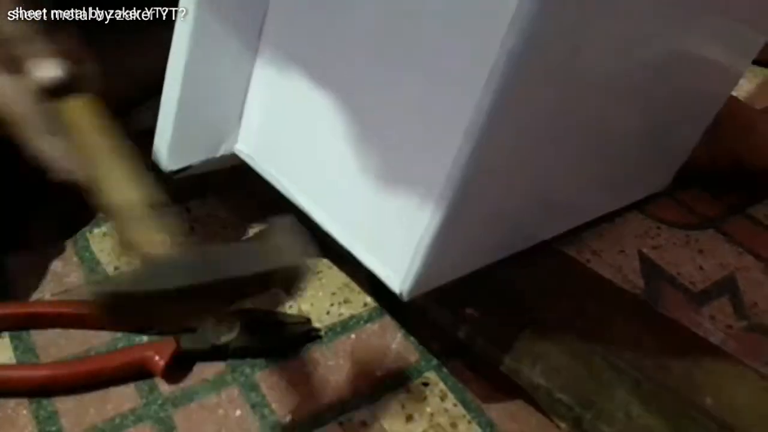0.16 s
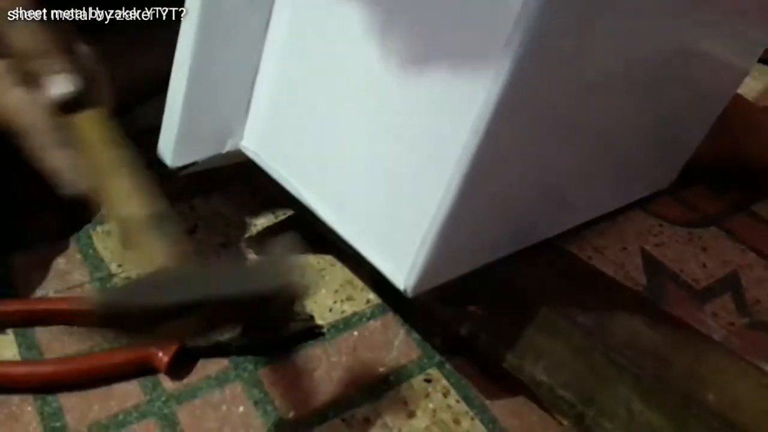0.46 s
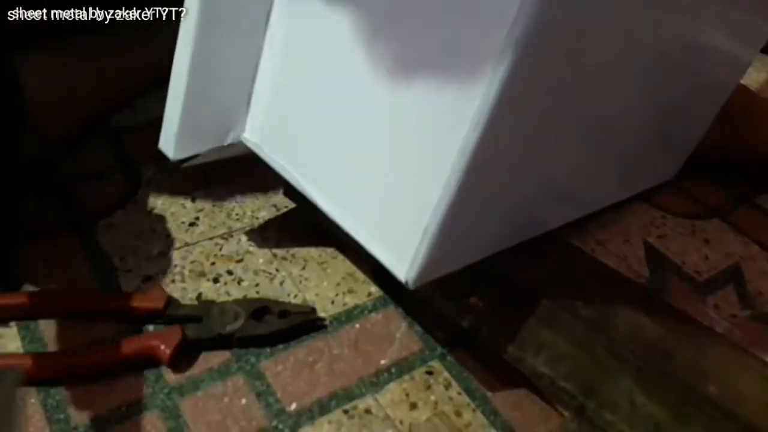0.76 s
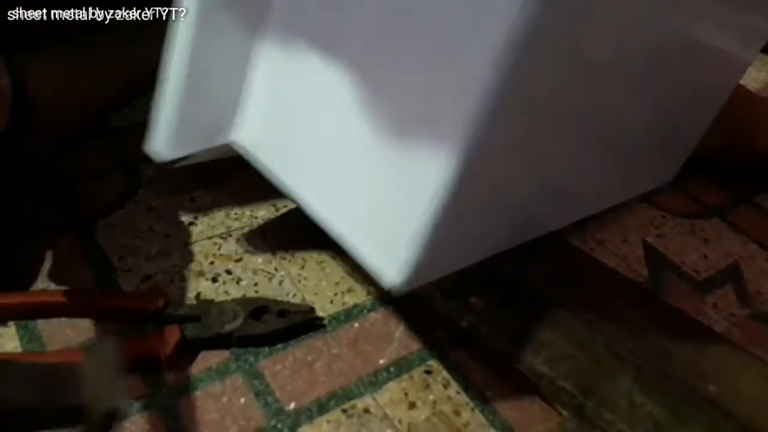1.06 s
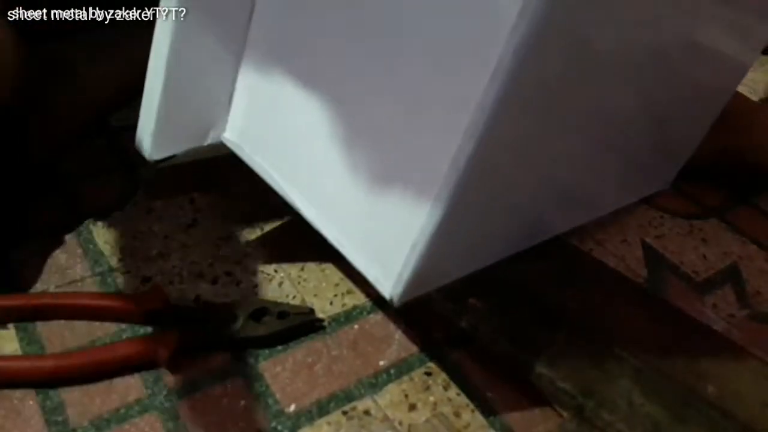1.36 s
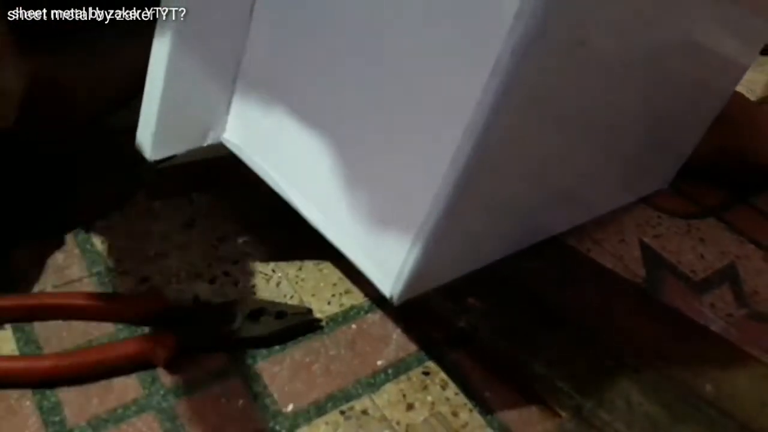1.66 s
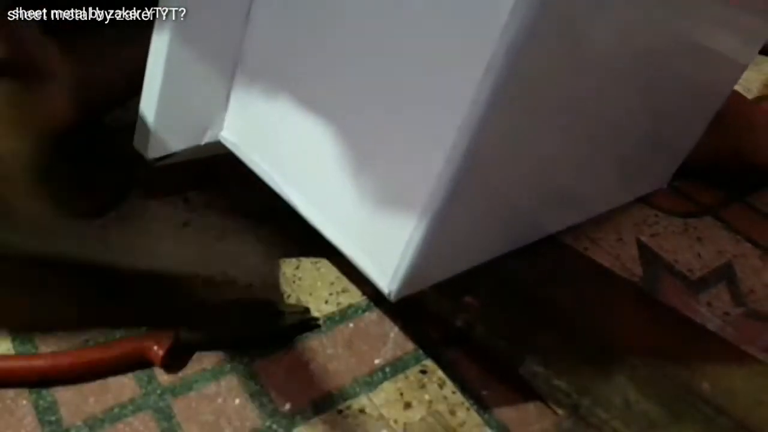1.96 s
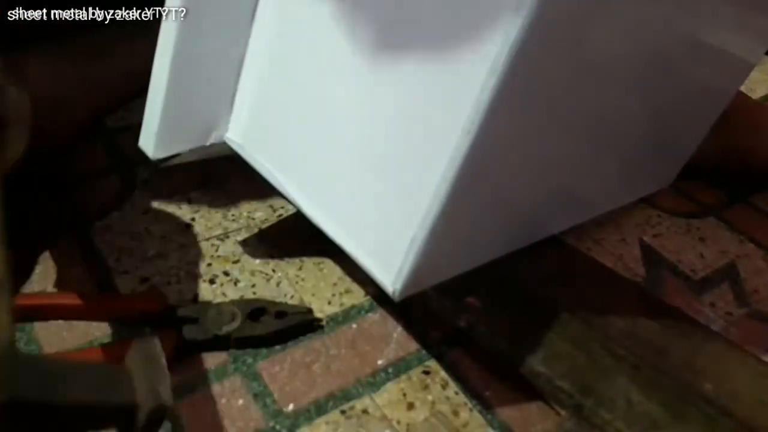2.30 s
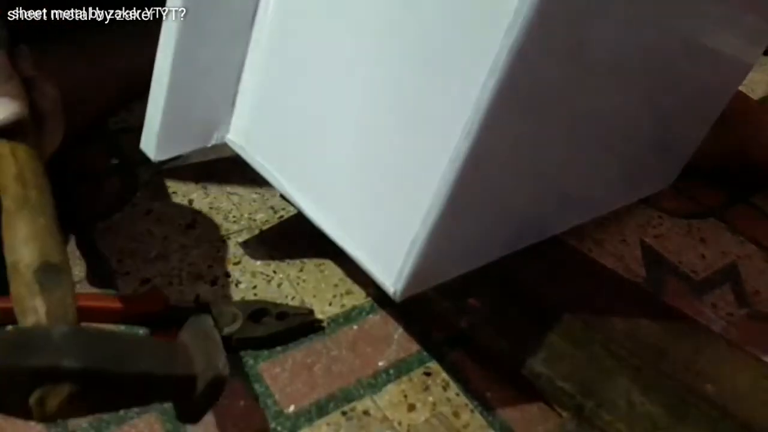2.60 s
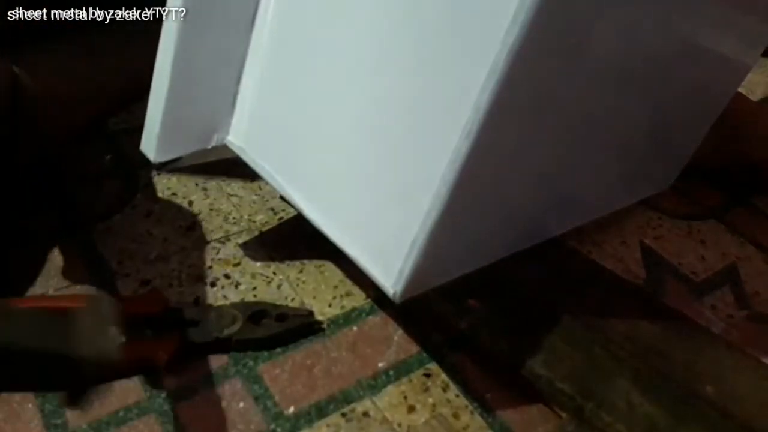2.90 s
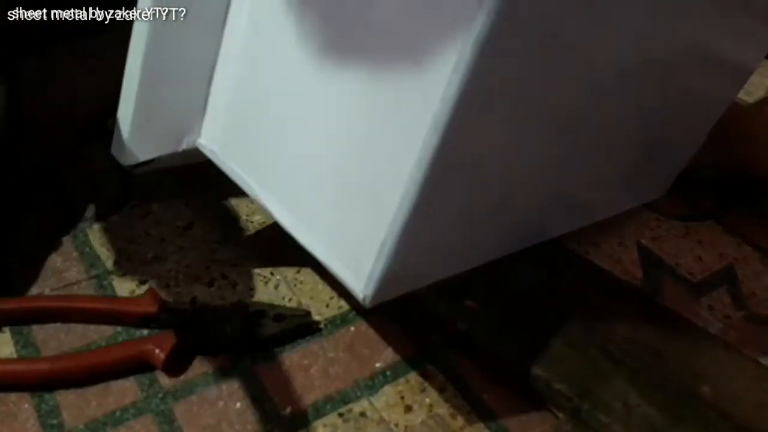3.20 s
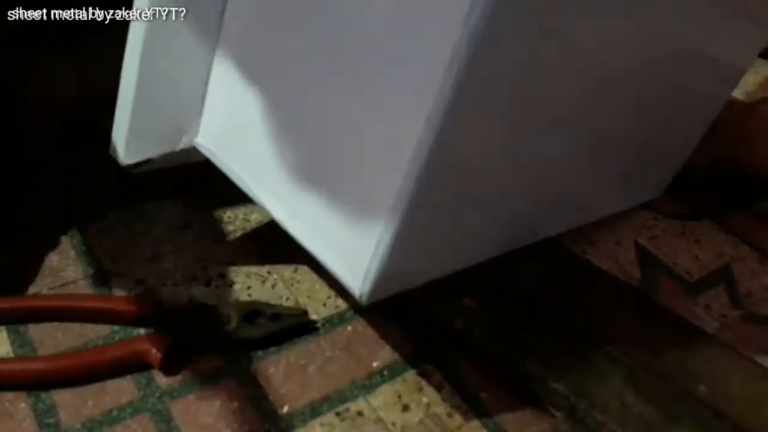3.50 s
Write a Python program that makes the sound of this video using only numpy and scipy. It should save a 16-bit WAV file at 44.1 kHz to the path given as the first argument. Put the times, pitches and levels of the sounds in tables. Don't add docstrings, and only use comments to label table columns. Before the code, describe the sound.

Hammer blows on a hollow sheet-metal box: a weak first hit, then seven loud, clashing blows at uneven gaps, with faint tool taps and scrapes on tiles between them, close to the microphone, over soft workshop hum.

```python
import sys
import numpy as np
from scipy import signal
from scipy.fft import rfft, irfft
from scipy.io import wavfile
from scipy.ndimage import uniform_filter1d

SR = 44100
rng = np.random.default_rng(int(sys.argv[2]) if len(sys.argv) > 2 else 0)


def ratio_of_db(decibels):
    return 10 ** (np.asarray(decibels, float) / 20)


def transcribe(signal):
    frames = np.atleast_2d(signal).T
    limited = np.clip(frames, -1, 1)
    pcm = np.round(limited * 32767).astype(np.int16)
    wavfile.write(sys.argv[1], SR, pcm)


N = 160965

# [t/s, treble level/dB, middle level/dB, bass level/dB, crash length as a share]
BLOWS = [
    (0.264, -29.5, -26.5, -21.5, 1.04),
    (0.4521, -15.5, -14, -14, 1.074),
    (1.136, -14, -9, -10.5, 1.04),
    (1.548, -13, -10.5, -13, 1.01),
    (1.8428, -14, -9.5, -12.5, 1.07),
    (2.1025, -16.5, -11, -14.5, 1.096),
    (3.0588, -13.5, -9, -10, 1.09),
    (3.392, -12, -8, -12, 1.076),
]
# [t/s, treble level/dB, middle level/dB, bass level/dB, length share]
TAPS = [
    (.051, -41.5, -43.5, -40.5, 0.77),
    (0.6952, -42.5, -45, -47.5, 0.46),
    (0.833, -39, -38.5, -29.5, 1),
    (0.9313, -46, -34.5, -30.5, 1),
    (2.341, -40, -38.5, -36.5, 0.8),
    (2.4861, -59, -48, -47.5, 0.55),
    (2.5513, -62, -55, -53, 1),
    (2.6393, -47.5, -46, -39, 0.94),
]
# [start t/s, rise/s, fall/s, level/dB, tool ring level/dB]
DRAGS = [
    (-.1, 0.017, 0.58, -42.5, -8),
    (0.14, 0.1, 0.11, -47, -6),
    (0.658, .09, 0.23, -40, -7.5),
    (0.9, 0.048, 0.042, -42, -7.5),
    (1.022, 0.11, 0.098, -35, -10),
    (2.36, 0.038, 1, -59.5, -5),
    (2.83, 0.054, 0.32, -40.5, -7),
    (2.996, 0.045, 0.12, -36, -12),
    (2.749, .1, 0.17, -62.5, -16),
]
# [t/s, level/dB]
HEAD_HITS = [
    (1.136, -57),
    (2.1035, -59),
    (3.393, -36),
]
# [t/s, level/dB]
PLIERS_HITS = [
    (.06, -61),
    (.70, -59),
    (.836, -59),
    (2.34, -57),
    (2.4843, -62),
    (2.5516, -60),
    (2.875, -57),
]
# [t/s, level/dB]
HANDLE_HITS = [
    (.052, -34.5),
    (.833, -31),
    (1.09, -38),
]
# [f/Hz, level/dB, t60/s]
BOX_MODES = [(102, -16, .5), (238, -3, .7), (285, -9, .4), (385, -7, .42), (462, -9, .4), (501, -6, .42),
             (585, -5, .4), (667, -3, .42), (750, -7, .36), (797, -6, .34), (1082, -9, .28),
             (1206, -9, .27), (1625, -11, .2), (2083, -13, .18)]
# [f/Hz, level/dB, t60/s]
HEAD_MODES = [(3268, -5, .35), (4021, 0, .4), (4710, -9, .3), (5184, 1, .5), (5825, -7, .35),
              (6024, -1, .45), (6589, -4, .4), (7400, -8, .3), (7569, -10, .3)]
# [f/Hz, level/dB, t60/s]
PLIERS_MODES = [(1750, -8, 0.075), (3200, -15.5, .04), (3560, -6.5, .06), (3970, 4, 0.082),
                (5900, -8.5, .04)]
# [f/Hz, level/dB, t60/s]
HANDLE_MODES = [(231, -1.5, 0.098), (332, -8, 0.15), (400, -5, 0.15), (644, -7.5, 0.11)]
# [f/Hz, level per Hz/dB]
CRASH_COLOUR = [(40, -34), (90, -15.5), (234, -5), (330, -5.5), (620, -3.5), (2200, -10), (4200, -5),
                (8000, -13.5), (16000, -22.5)]
# [f/Hz, t60/s]
CRASH_T60 = [(80, .75), (240, 0.57), (350, 0.46), (1000, 0.37), (2000, 0.28), (3880, 0.19), (10200, 0.18)]
# [f/Hz, level per Hz/dB]
DRAG_COLOUR = [(150, -34.5), (634, -5.5), (1000, -12.5), (1900, -9.5), (4090, -8), (7950, -15.5),
               (12000, -21.5), (16000, -23)]
# [f/Hz, level per Hz/dB]
HUM_COLOUR = [(30, -23), (70, -10.5), (239, 0.5), (400, -10.5), (900, -14.5), (1900, -30.5), (4500, -30),
              (16000, -53)]
EDGES_HZ = 40 * 2 ** np.arange(0, 8.8, 1 / 3)

BASS_HZ, MIDDLE_HZ, TREBLE_HZ = 700, 1550, 4100
CRASH_DB, COLOUR_DB, FLICKER_DB = 18, 2, 0
EARLY_T60_S = 0.1
RISE_S, RISE_HZ, LONGEST_RISE_S = 0.0038, 1000, 0.013
TAP_SLOWER = 3.8
CHIRP_DB, CHIRP_TOP_HZ, CHIRP_S = -5, 9170, 0.0032
BOX_DB = -5.5
TWIN_DB, WAVER_DB = 0.5, 3
GRAINS_PER_S, GRAIN_SPREAD_DB = 6000, 1.8
HUM_DB = -51
MIC_LOW_HZ, MIC_STEP_HZ, MIC_STEP_DB, MIC_TOP_HZ = 60, 8610, -7, 15600
LIMIT_DB, RELEASE_DB_PER_S, RATIO = -5, 150, 0.5
TOP = 1.5


def at_hz(points, hz):
    table = np.array(points)
    return np.interp(np.log(hz), np.log(table[:, 0]), table[:, 1])


def rms_one(x):
    return x / np.sqrt(np.mean(x ** 2) + 1e-20)


def band(x, low, high):
    return signal.sosfilt(signal.butter(2, [low, high], "band", fs=SR, output="sos"), x)


def coloured(x, spectrum):
    out = np.zeros(N)
    for k, (low, high) in enumerate(zip(EDGES_HZ, EDGES_HZ[1:])):
        level = ratio_of_db(at_hz(spectrum, np.sqrt(low * high)))
        out += level * band(x[k % 2], low, high)
    return rms_one(out)


def ring(clicks, hz, t60):
    r = ratio_of_db(-60 / (t60 * SR))
    w = 2 * np.pi * hz / SR
    return signal.lfilter([0, np.sin(w)], [1, -2 * r * np.cos(w), r * r], clicks + 1e-18)


def slow_waver():
    steps = rng.standard_normal(N // 16 + 1)
    smooth = uniform_filter1d(uniform_filter1d(steps, size=50), size=50)
    return np.repeat(rms_one(smooth), 16)[:N]


def struck(hits, modes, spread_db, shake_s, pair, tilt_db=0):
    out = np.zeros(N)
    hits = np.array(hits)
    t = np.arange(1500) / SR
    at = (hits[:, :1] * SR).astype(int) + np.arange(len(t))
    fade = rms_one(np.exp(-t / shake_s)) / np.sqrt(len(t))
    for hz, level_db, t60 in modes:
        tilt = np.clip(np.log(hz / BASS_HZ) / np.log(MIDDLE_HZ / BASS_HZ), 0, 1)
        luck_db = spread_db * rng.standard_normal((len(hits), 1))
        strength = ratio_of_db(hits[:, 1:2] + tilt_db * tilt + level_db + luck_db)
        clicks = np.zeros(N + len(t))
        clicks[at] = strength * fade * rng.choice([-1, 1], at.shape)
        tone = ring(clicks[:N], hz, t60)
        twin = ring(clicks[:N], hz * (1 + pair), t60)
        out += ratio_of_db(WAVER_DB * slow_waver() - 2) * (tone + ratio_of_db(TWIN_DB) * twin)
    return out


def workshop_hum():
    return ratio_of_db(HUM_DB) * coloured(rng.standard_normal((2, N)), HUM_COLOUR)


def drags():
    grains = rng.random((2, N)) < GRAINS_PER_S / SR
    sizes = ratio_of_db(GRAIN_SPREAD_DB * rng.exponential(1, (2, N)))
    grit = grains * sizes * rng.choice([-1, 1], (2, N))
    t, stroke, singing = np.arange(N) / SR, np.zeros(N), np.zeros(N)
    for s, rise, fall, db, ring_db in DRAGS:
        before_peak = (s + rise - t) / rise * 0.61
        after_peak = (t - s - rise) / fall
        shape = ratio_of_db(db - 32.7 * np.maximum(before_peak, after_peak))
        stroke += shape
        singing += shape * ratio_of_db(ring_db)
    rings = rms_one(sum(ratio_of_db(db) * ring(grit[0], hz, t60) for hz, db, t60 in PLIERS_MODES))
    return stroke * coloured(grit, DRAG_COLOUR) + singing * rings


def wooden_handle():
    return struck(HANDLE_HITS, HANDLE_MODES, spread_db=0.9, shake_s=0.0001, pair=0.039)


def pliers():
    return struck(PLIERS_HITS, PLIERS_MODES, spread_db=3.3, shake_s=0.0032, pair=0.0074)


def hammer_head():
    return struck(HEAD_HITS, HEAD_MODES, spread_db=0.96, shake_s=0.00001, pair=0.002)


def box_boom():
    knocks = BLOWS + TAPS
    hits = [(s, bass_db + BOX_DB) for s, _, _, bass_db, _ in knocks]
    tilt_db = np.array([[middle_db - bass_db] for _, _, middle_db, bass_db, _ in knocks])
    return struck(hits, BOX_MODES, spread_db=2.06, shake_s=0.0001, pair=0.037, tilt_db=tilt_db)


def chirps():
    out, t = np.zeros(N + 1000), np.arange(1000) / SR
    hz = CHIRP_TOP_HZ / (1 + 4 * t / CHIRP_S)
    swell = (t / CHIRP_S) * np.exp(1 - 2 * t / CHIRP_S) * 2
    sweep = np.sin(2 * np.pi * np.cumsum(hz) / SR) * swell
    for s, treble_db, *_ in BLOWS:
        start = int(s * SR)
        out[start:start + len(t)] += ratio_of_db(treble_db + CHIRP_DB) * sweep
    return out[:N]


def crash():
    out, white = np.zeros(N), rng.standard_normal((2, N))
    knocks = BLOWS + TAPS
    rise = RISE_S * np.repeat([1, TAP_SLOWER], [len(BLOWS), len(TAPS)])[:, None]
    colour = COLOUR_DB * rng.standard_normal((len(knocks), len(EDGES_HZ)))
    s, treble_db, middle_db, bass_db, share = np.array(knocks).T[:, :, None]
    grid = np.arange(0, N + 16, 16)
    t = np.maximum(grid / SR - s, 0)
    fall = 2 * np.log(1000) * t / share
    for k, (low, high) in enumerate(zip(EDGES_HZ, EDGES_HZ[1:])):
        hz = np.sqrt(low * high)
        bass, middle, treble = (np.interp(np.log(hz), np.log([BASS_HZ, MIDDLE_HZ, TREBLE_HZ]), weight)
                                for weight in np.eye(3))
        shape = np.exp(-fall / at_hz(CRASH_T60, hz)) + np.exp(-fall / EARLY_T60_S)
        band_rise = np.minimum(rise * np.sqrt(RISE_HZ / hz), LONGEST_RISE_S)
        swell = (1 - np.exp(-t / band_rise)) ** 2
        level_db = treble * treble_db + middle * middle_db + bass * bass_db + colour[:, k:k + 1]
        power = np.sum(swell * shape * ratio_of_db(2 * level_db), axis=0)
        flicker = FLICKER_DB * rms_one(uniform_filter1d(rng.standard_normal(len(grid)), size=12))
        gain = ratio_of_db(at_hz(CRASH_COLOUR, hz) + CRASH_DB + flicker) * np.sqrt(power)
        out += np.interp(np.arange(N), grid, gain) * band(white[k % 2], low, high)
    return out


def scene():
    ringing = box_boom() + hammer_head() + pliers()
    hum = workshop_hum()
    sheet = crash() + chirps()
    tools = wooden_handle() + drags()
    return (ringing + hum + sheet + tools)[None]


def band_limit(x):
    return signal.sosfilt(signal.butter(12, 16640, fs=SR, output="sos"), x)


def record(dry):
    x = signal.sosfilt(signal.butter(2, MIC_LOW_HZ, "high", fs=SR, output="sos"), dry)
    f = np.arange(N // 2 + 1) * SR / N
    step_db = MIC_STEP_DB / (1 + (MIC_STEP_HZ / (f + 1)) ** 20)
    end_db = -50 / (1 + (MIC_TOP_HZ / (f + 1)) ** 150)
    x = irfft(rfft(x) * ratio_of_db(step_db + end_db), N)
    fall = RELEASE_DB_PER_S * np.arange(N) / SR
    level = np.maximum.accumulate(20 * np.log10(np.abs(x[0]) + 1e-9) + fall) - fall
    gain_db = uniform_filter1d(-RATIO * np.maximum(level - LIMIT_DB, 0), size=44)
    mix = TOP * np.tanh(x * ratio_of_db(gain_db) / TOP)
    return band_limit(mix)


dry = scene()
out = record(dry)
transcribe(out)
```